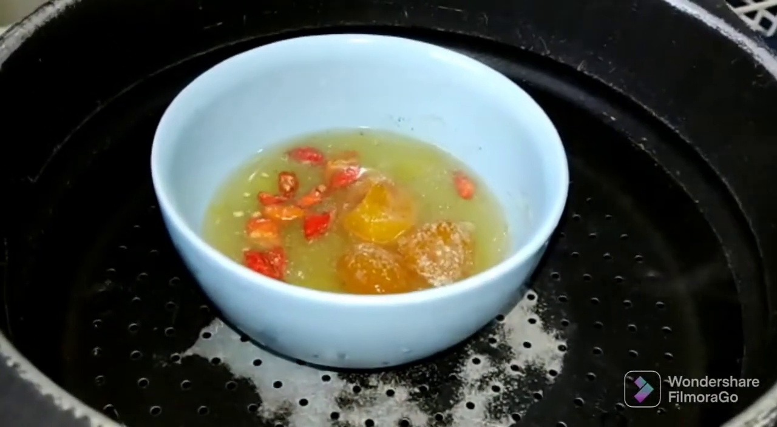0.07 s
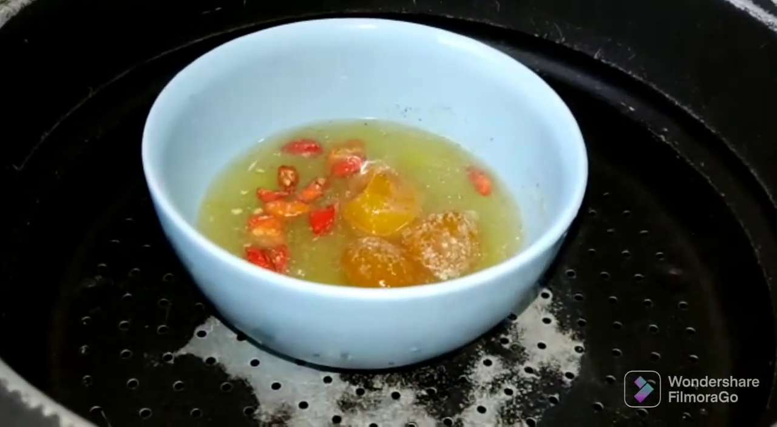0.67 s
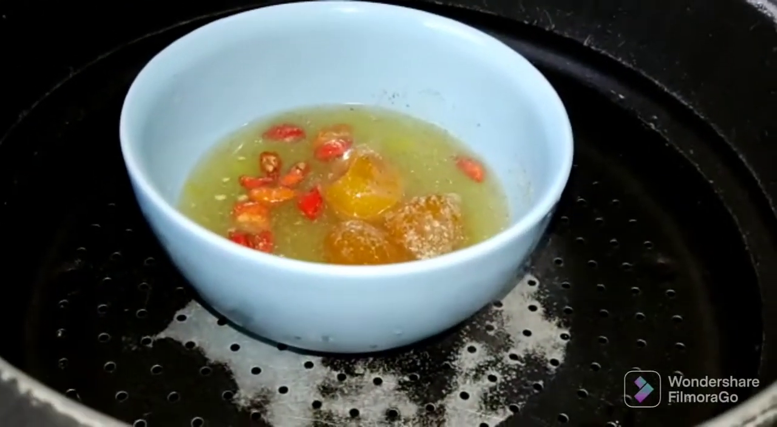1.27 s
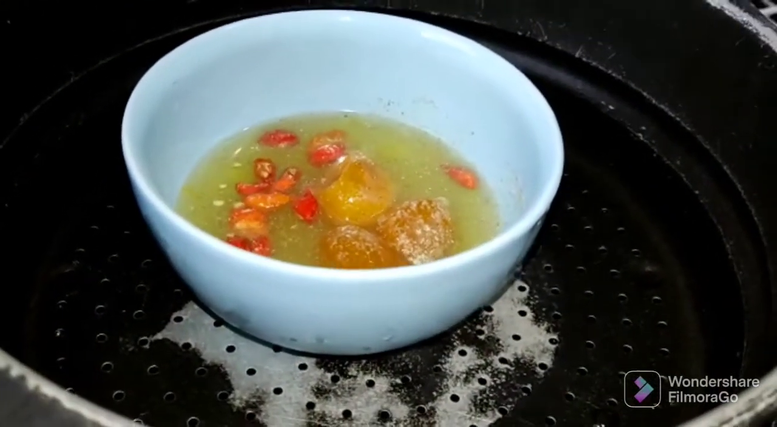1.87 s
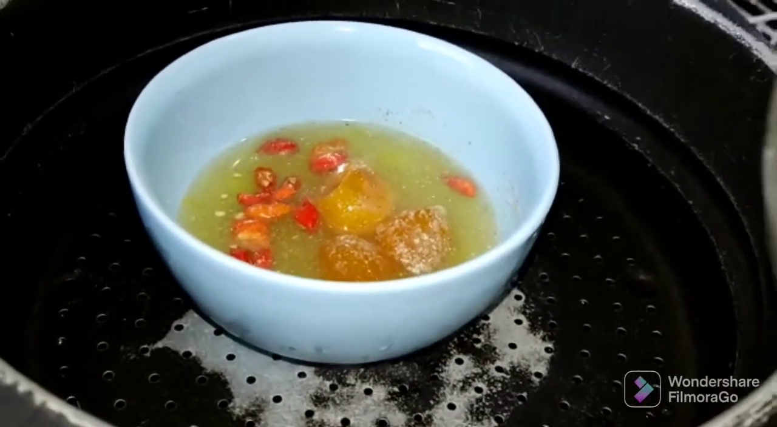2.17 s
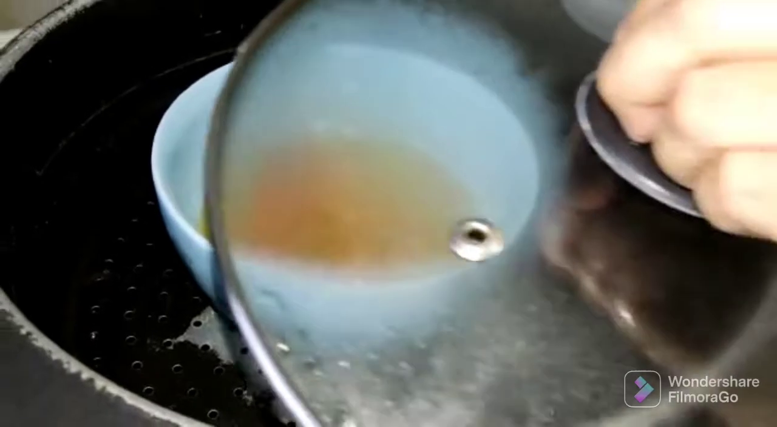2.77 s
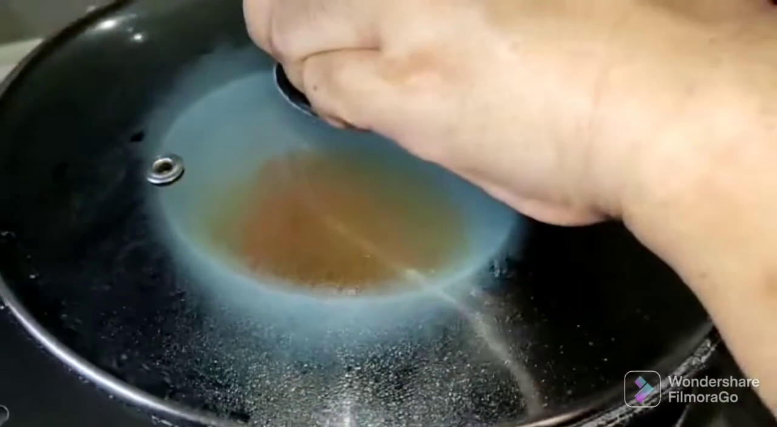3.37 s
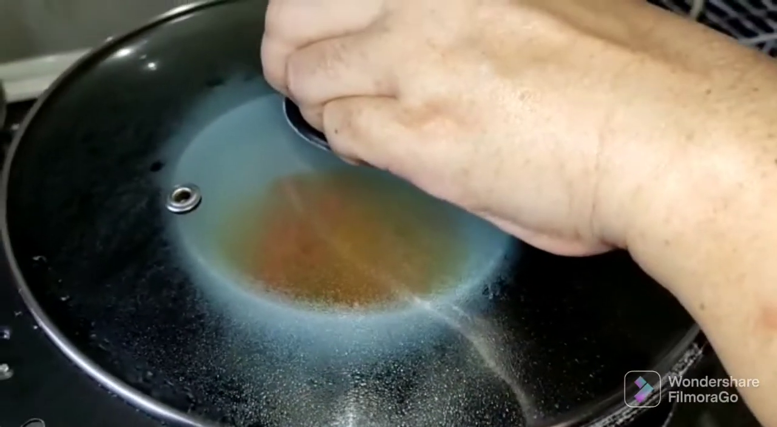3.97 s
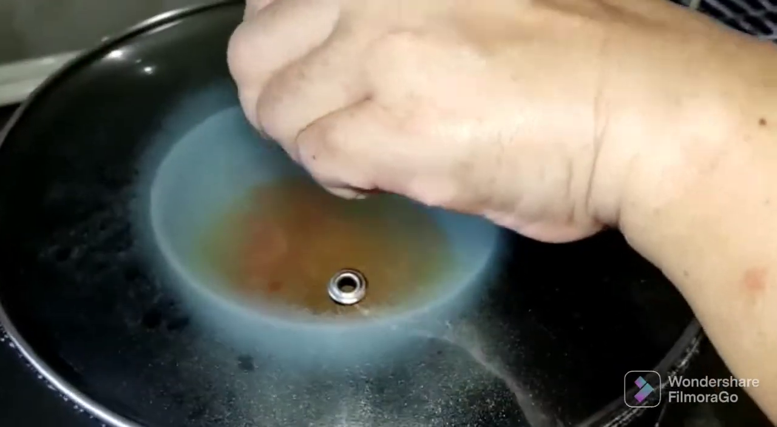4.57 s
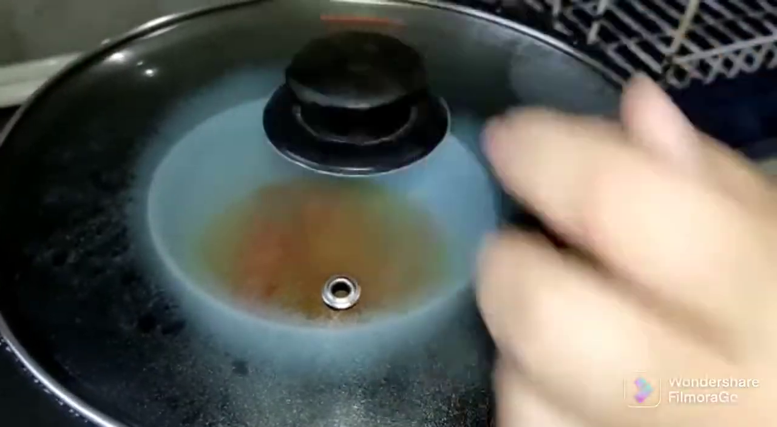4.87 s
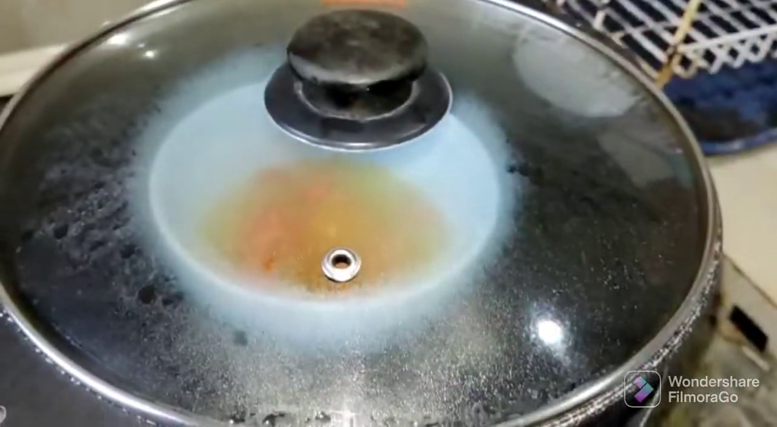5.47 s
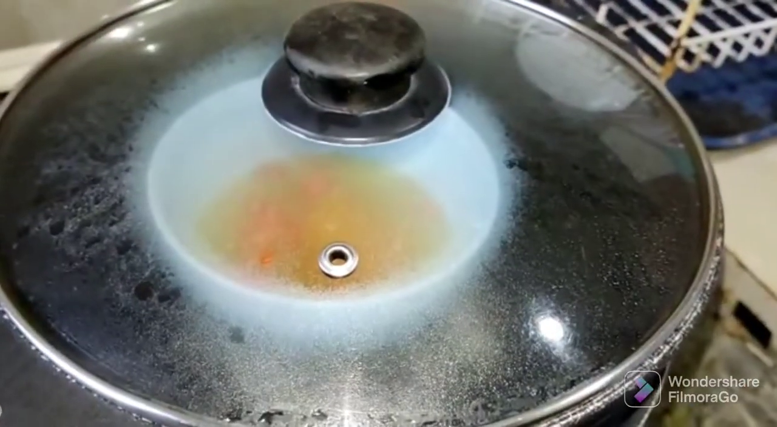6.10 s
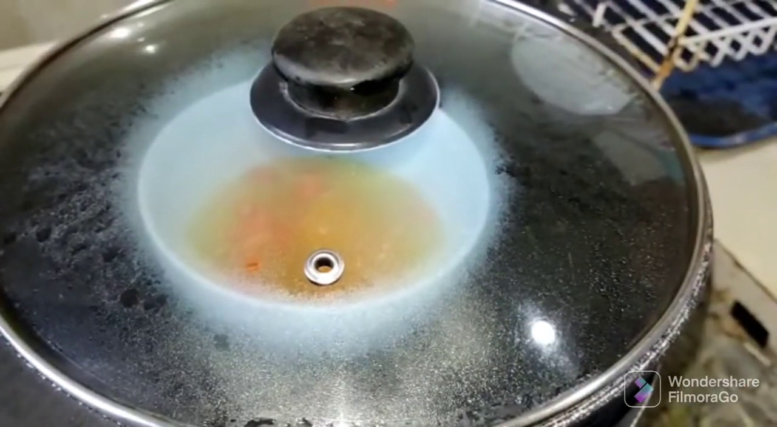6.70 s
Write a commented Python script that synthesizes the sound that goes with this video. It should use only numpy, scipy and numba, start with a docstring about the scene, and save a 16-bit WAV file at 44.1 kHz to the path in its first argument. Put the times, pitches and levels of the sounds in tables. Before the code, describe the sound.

Heard from just above a metal pot, a glass lid with a steel rim is lifted with a few quick, ringing clacks. It touches the pot, knocks sharply, slides with a light grainy scrape and rattles shut with a low, hollow thud. A last push rubs it home. Faint kitchen room tone and a fan's hum continue before and after.

```python
"""A quiet kitchen, a fan humming off to the right; a phone's two microphone ports close above a metal pot.
At 1.75 s a steel-rimmed glass lid is picked up, and its rim clacks and rings. At 2.5 s it touches the
pot, knocks and is dragged across; the air beneath booms ever lower as the gap closes. From 3.3 s the lid
clatters into its seat, the pot thuds, and a push of the hand rubs the rim home. A second push, strongest
near 4.5 s, dies away and leaves the fan and the room."""
import sys
import numpy as np
from scipy import signal
from scipy.fft import rfft, irfft, next_fast_len
from scipy.io import wavfile
from numba import njit

SR = 44100
rng = np.random.default_rng(int(sys.argv[2]) if len(sys.argv) > 2 else 0)


def log_audio(samples):
    """Write samples as a 16-bit WAV file to the path given in sys.argv[1]."""
    # one column per channel
    frames = np.atleast_2d(samples).T
    # limit to full scale, then quantise
    limited = np.clip(frames, -1, 1)
    pcm = np.round(limited * 32767).astype(np.int16)
    wavfile.write(sys.argv[1], SR, pcm)


N = 297234
TIME = np.arange(N) / SR
TOUCH_S, DROP_S, SEATED_S = 2.52, 3.27, 3.8  # the lid meets the pot, starts to drop, sits in its seat
PORTS_PART_HZ = 1100  # above this the two ports hear the lid differently


# Knocks of the rim, close up: t/s, level/dB, body f/Hz, body gain/dB, thump gain/dB, edge gain/dB,
# build-up/ms, lid modes/dB, share through the pot wall/0-1, left minus right/dB
RIM_KNOCKS = [(1.7485, -26, 646, 4, 4, -3, 1, -6, 0.23, 0.5),
              (1.771, -33, 870, 16.5, 11, -27, 0.36, -11, 0.1, -0.5),
              (1.7794, -34, 680, -5, -6, 7.5, 1.0, -2, 0, 1),
              (1.8335, -26, 780, 12, 14, -5, 0.37, -6.5, 0.22, -3.5),
              (1.8398, -31.5, 880, -1, 12, -7.5, 0.47, -0.5, 0.3, 8.5),
              (2.5194, -26, 765, 14.5, 7, -9, 0.11, -6.5, 0, -0.5),
              (2.72, -15, 696, 6, 1, -1.5, 0.49, -5, 0.72, -0.5),
              (3.3203, -21.5, 320, 5.5, -1, 2.5, .3, -4.5, 0.1, -0.5),
              (3.412, -28.5, 290, 6, 1, 3, 0.23, -19, 0.4, 1.5),
              (3.455, -35, 260, -6, -31, -8, 0.92, 5, 0.2, -9),
              (3.467, -26, 477, 7.5, -5.5, 2, 0.14, 1, 0.4, -1),
              (3.4710, -16, 784, -20, -5, 0, 0.63, -4.5, 0.13, 4)]
# Light ticks of the sliding rim: t/s, level/dB
RIM_TICKS = [(2.613, -62), (2.949, -44), (3.305, -41.5), (4.195, -50.5)]

def rim_knocks(comb, body_width_ratio=0.22, body_t60=0.81, thump_hz=500, edge_hz=6000, tick_hz=4000):
    """Flat blows of the rim have thump and a hollow body, glancing ones more edge; ticks are all treble."""
    out, t = np.zeros((2, N)), np.arange(SR * 3 // 4) / SR
    ending = np.minimum(1, 10 * (t[-1] - t)) ** 2
    for s, db, body_hz, body_db, thump_db, edge_db, build_ms, modes_db, wall_share, pan_db in RIM_KNOCKS:
        contact = 1 - np.exp(-t * 1000 / build_ms)
        clack = filtered(clatter(t, comb), lambda f: 1 + wall_share * (pot_wall(f) - 1))
        blow = contact * (clack + undb(modes_db) * lid_ring(t))
        # the hollow body sounds with the contact and dies sooner than the ring
        damped = blow * fade(t, body_t60)
        hollow = filtered(damped, lambda f: resonance(f, body_hz, body_width_ratio * body_hz))
        thump = lambda f: undb(thump_db / (1 + (f / thump_hz) ** 4))
        edge = lambda f: undb(edge_db / (1 + (edge_hz / (f + 1)) ** 4))
        blow = filtered(blow + (undb(body_db) - 1) * hollow, lambda f: thump(f) * edge(f))
        add(out, s, undb(db + np.array([[pan_db], [-pan_db]]) / 2) * blow * ending)
    for s, db in RIM_TICKS:
        tick = filtered(clatter(t, comb), lambda f: f / np.hypot(f, tick_hz))
        add(out, s, undb(db) * tick * ending)
    return out


# Dense ring of steel and glass, heard from just above: f/Hz, level/dB
CLATTER_SPECTRUM = [(40, -19), (115, 5.5), (190, 0.5), (400, 3.5), (700, 8.5), (1100, 7), (2200, 6),
                    (3000, 3), (4300, 7.5), (5600, 6.5), (9000, 6.5), (14000, -6)]
# Its tail in the kitchen: f/Hz, t60/s
KITCHEN_TAIL = [(100, 0.91), (300, 0.6), (700, 0.56), (2500, 0.54), (8000, 0.33), (14000, 0.33)]

def clatter(t, comb, crack_t60=0.076, snap_t60=0.006, snap_db=-1, tail_db=-10):
    """Countless close modes: a chattering crack, then a tail whose treble dies first."""
    spot = weak_modes(spacing_hz=118.73, spread_db=5)  # where the rim lands weights the modes
    colour = lambda f: at_hz(comb, f) * at_hz(spot, f) * undb(at_hz(CLATTER_SPECTRUM, f))
    noise = filtered(diffuse(len(t), PORTS_PART_HZ), colour)
    attack = np.hypot(fade(t, crack_t60), undb(snap_db) * fade(t, snap_t60))
    attack *= grain(t, step_s=0.00093, spread_db=2)
    out, centres = 0, np.geomspace(100, 14000, 7)
    for hz, share in zip(centres, np.eye(len(centres))):
        band = filtered(noise, lambda f: at_hz(np.c_[centres, share], f))
        tail = undb(tail_db) * fade(t, at_hz(KITCHEN_TAIL, hz))
        out = out + band * np.hypot(attack, tail)
    return out


# Clearest modes of lid and pot: f/Hz, relative level/dB
CLEAR_MODES = [(310, -16), (464, -13), (549, -27), (657, -16), (699, -9.5), (929, -17.5), (1326, -17),
               (1497, -12), (1640, -9), (2223, -15), (2515, -14.5), (2697, -14), (3070, -17.5), (3295, -17),
               (3842, -5), (4151, -17), (4317, -15), (4780, -13), (5093, -14), (6799, -36), (7257, -11),
               (8239, -35), (9011, -33), (11785, -13)]

def lid_ring(t, ring_db=-4, tail_share=0.62):
    """Each blow weights the clear modes anew, and the high ones reach the two ports out of step."""
    out = 0
    for (hz, db), (weight, sign, skew) in zip(CLEAR_MODES, rng.uniform(-1.2, 1, (len(CLEAR_MODES), 3))):
        phase = np.array([[1], [-1]]) * skew * min(hz / PORTS_PART_HZ / 2, np.pi / 2)
        gain = np.sign(sign) * undb(db + ring_db + 2 * weight)
        decay = fade(t, tail_share * at_hz(KITCHEN_TAIL, hz))
        out = out + gain * decay * np.sin(2 * np.pi * hz * t + phase)
    return out


# Quickly damped resonances of the pot wall: f/Hz, width/Hz, level/dB
WALL_MODES = [(1500, 70, -14), (1733, 41, 5), (1970, 70, 4.5), (2180, 180, 4), (2800, 67, 14.5),
              (3090, 66, 9.5), (3430, 120, -1), (3800, 200, 5.5), (4190, 160, -1), (4560, 110, 3),
              (4800, 190, 0), (6070, 380, 4.5), (7000, 240, -2), (9200, 2700, -2), (12700, 1600, 2)]

def pot_wall(f, stiff_hz=1700):
    """The wall passes the bass whole and the treble only through its resonances."""
    bass = 1 / (1 + (f / stiff_hz) ** 2)
    return bass + sum(undb(db) * resonance(f, hz, width) for hz, width, db in WALL_MODES)


# Steel rim rubbing on the pot, close up: f/Hz, level/dB
SCRAPE_SPECTRUM = [(100, 8), (300, 5), (600, 6.5), (790, 2.5), (930, 5), (1100, -3), (2050, 6),
                   (2500, -1.5), (3150, -0.5), (3800, 2.5), (5500, 2.5), (7500, 5.5), (12000, -2),
                   (14000, -6)]

def rim_scrape(comb, modes_db=1, mode_width_hz=35):
    """The rim catches on tiny bumps: a grainy hiss that also excites the lid's modes."""
    friction = diffuse(N, PORTS_PART_HZ) * hand_effort() * grain(TIME, step_s=0.0028, spread_db=2)
    body = lambda f: 1 + undb(modes_db) * sum(resonance(f, hz, mode_width_hz) for hz, _ in CLEAR_MODES)
    return filtered(friction, lambda f: undb(at_hz(SCRAPE_SPECTRUM, f)) * body(f) * at_hz(comb, f))


# Pushes that rub the lid into its seat: peak t/s, friction level/dB, length/s
HAND_PUSHES = [(3.465, -41.5, 0.56), (4.462, -41, 0.56)]

def hand_effort(drag_db=-50.5, ease_db_per_s=3.5, attack_s=0.1, release_s=0.1, rise_share=0.57):
    """Strength of the friction: one long drag that eases off, then pushes that swell and stop."""
    since = np.maximum(TIME - TOUCH_S, 0)
    gate = np.minimum(since / attack_s, 1) * np.exp(-np.maximum(TIME - DROP_S, 0) / release_s)
    strength = gate * undb(drag_db - ease_db_per_s * since)
    for s, db, length_s in HAND_PUSHES:
        start = s - rise_share * length_s
        push = np.interp(TIME, [start, s, start + length_s], [0, 1, 0]) ** 1.55  # a pointed swell
        strength = np.maximum(strength, undb(db) * push)
    return strength


def pot_air(blows, friction, width_hz=85, boom_db=9, rustle_db=12, closed_hz=320):
    """The air under the lid resonates; blows drive it harder the more it is shut in."""
    hz = air_pitch()
    shut_in = np.minimum(1, closed_hz / hz) ** 4 * (TIME > TOUCH_S)
    drive = undb(boom_db) * shut_in * blows + undb(rustle_db) * friction * (TIME < SEATED_S)
    return moving_band(drive.mean(axis=0), hz, width_hz)


def air_pitch(open_hz=512, sink_hz_per_s=170, seated_hz=225.6, fall_s=0.14):
    """The air's note sinks as the lid covers the opening, then falls quickly as the lid drops."""
    covering = open_hz - sink_hz_per_s * (np.clip(TIME, TOUCH_S, DROP_S) - TOUCH_S)
    return seated_hz + (covering - seated_hz) * np.exp(-np.maximum(TIME - DROP_S, 0) / fall_s)


def pot_thud(contact, hz=151, width_hz=130, db=1.5):
    """Once the lid is on, every contact shakes the whole pot on its stand: a dull, low thud."""
    return undb(db) * filtered(contact * (TIME > TOUCH_S), lambda f: resonance(f, hz, width_hz) ** 2)


# Room tone of the kitchen: f/Hz, level in a 1 Hz band/dB
ROOM_TONE = [(10, -66.5), (30, -75), (70, -80), (120, -81), (170, -81.5), (260, -81), (340, -86.5),
             (600, -89), (1200, -93), (2100, -95), (4300, -105), (7000, -104), (10000, -104), (14000, -107)]
# Wavering hum of the fan, off to the right: f/Hz, nominal width/Hz, level/dB
FAN_HUM = [(216.1, 12, -55.5), (253.7, 8.7, -62), (437.5, 14.3, -67.5)]

def kitchen(lag_s=0.000363, rumble_db=-64, rumble_hz=35):
    """Steady room tone and fan hum reach the right port first; each port has its own faint rumble."""
    air = filtered(diffuse(N, part_hz=1000), lambda f: undb(at_hz(ROOM_TONE, f)) * np.sqrt(SR / 2))
    for hz, width, db in FAN_HUM:
        hum = filtered(rng.standard_normal(N), lambda f: resonance(f, hz, 2 * width) ** 2)
        air = air + undb(db) * hum / hum.std()
    rumble = filtered(rng.standard_normal((2, N)), lambda f: resonance(f, rumble_hz, rumble_hz) ** 2)
    return delayed_left(air, lag_s) + undb(rumble_db) * rumble / rumble.std()


def weak_modes(spacing_hz, spread_db):
    """A comb of weak modes of uneven strength: rows of f/Hz, gain."""
    gain = undb(spread_db * np.clip(rng.standard_normal(2000), -2, 2))
    return np.c_[1 + np.arange(len(gain)) * spacing_hz, gain / np.sqrt(np.mean(gain ** 2))]


def grain(t, step_s, spread_db):
    """A gain that jumps about as the rim meets tiny bumps."""
    return undb(spread_db * np.interp(t / step_s, np.arange(len(t)), rng.standard_normal(len(t))))


def diffuse(size, part_hz):
    """White noise at the two ports: alike in the bass, unrelated in the treble."""
    common, own = rng.standard_normal(size), rng.standard_normal((2, size))
    apart = lambda f: .08 + .92 * f ** 2 / (f ** 2 + part_hz ** 2)
    return filtered(common, lambda f: np.sqrt(1 - apart(f))) + filtered(own, lambda f: np.sqrt(apart(f)))


def delayed_left(pair, lag_s):
    """A source to the right reaches the left port later."""
    return np.array([filtered(pair[0], lambda f: np.exp(-2j * np.pi * f * lag_s)), pair[1]])


def undb(db):
    """Decibels to gain."""
    return 10 ** (np.asarray(db) / 20)


def at_hz(rows, hz):
    """Rows of f/Hz, value, read on a log-frequency axis."""
    f, value = np.transpose(rows)
    return np.interp(np.log(np.maximum(hz, 1)), np.log(f), value)


def filtered(x, response):
    """Apply a gain given as a function of frequency."""
    size = next_fast_len(x.shape[-1])
    f = np.arange(size // 2 + 1) * SR / size
    return irfft(rfft(x, size) * response(f), size)[..., :x.shape[-1]]


def resonance(f, hz, width):
    """Response of one damped resonance, 1 at its centre."""
    return 1j * f * width / (hz ** 2 - f ** 2 + 1j * f * width)


def fade(t, t60):
    """Exponential decay, 60 dB in t60 seconds."""
    return np.exp(-np.log(1000) * t / t60)


def add(out, s, sound):
    """Mix a sound in at s seconds."""
    start = int(s * SR)
    out[:, start:start + sound.shape[1]] += sound[:, :N - start]


@njit
def moving_band(x, hz, width):
    """State-variable band-pass whose centre moves."""
    y, band_state, low_state = np.empty(len(x)), 0., 0.
    for i in range(len(x)):
        tuning, damping = np.tan(np.pi * hz[i] / SR), width / hz[i]
        band = (band_state + tuning * (x[i] + 1e-18 - low_state)) / (1 + tuning * (tuning + damping))
        band_state, low_state = 2 * band - band_state, low_state + 2 * tuning * band
        y[i] = damping * band
    return y


def scene(lowest_hz=65):
    """Lid and pot close up, a little nearer the right port, with the kitchen behind them."""
    room, comb = kitchen(), weak_modes(spacing_hz=30.36, spread_db=3)
    blows, friction = rim_knocks(comb), rim_scrape(comb)
    contact = blows + friction
    # the low cut keeps the knocks and scrape free of deep rumble
    low_cut = signal.butter(2, lowest_hz, "high", fs=SR, output="sos")
    lid_and_pot = signal.sosfilt(low_cut, contact + pot_air(blows, friction) + pot_thud(contact))
    return delayed_left(lid_and_pot, lag_s=0.00013) + room


# Resonances of the phone's left and right microphone ports: f/Hz, width/Hz, gain/dB
LEFT_MIC = [(7100, 700, 1.5), (8900, 1100, -1.5), (11470, 1280, 13)]
RIGHT_MIC = [(8420, 860, 3), (9170, 930, 12.5), (13500, 7700, -3.5)]

def record(dry, ceiling=0.8, top_hz=14300):
    """The phone above the pot: each port colours the treble, peaks are rounded, the top is cut steeply."""
    ports = []
    for channel, mic in zip(dry, (LEFT_MIC, RIGHT_MIC)):
        peaks = lambda f: [1 + (undb(db) - 1) * resonance(f, hz, width) for hz, width, db in mic]
        coloured = filtered(channel, lambda f: np.prod(peaks(f), axis=0))
        ports.append(coloured / (1 + (coloured / ceiling) ** 4) ** .25)
    return signal.sosfilt(signal.ellip(10, .2, 80, top_hz, fs=SR, output="sos"), np.array(ports))


dry = scene()
out = record(dry)
log_audio(out)
```